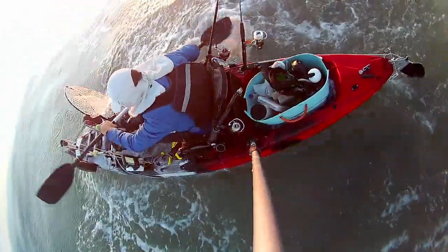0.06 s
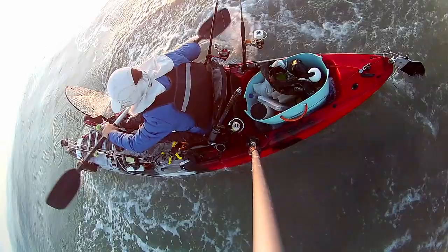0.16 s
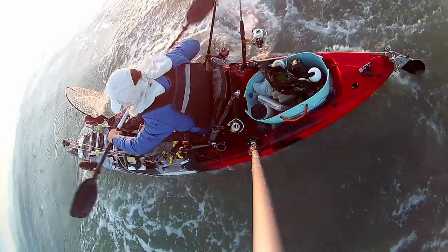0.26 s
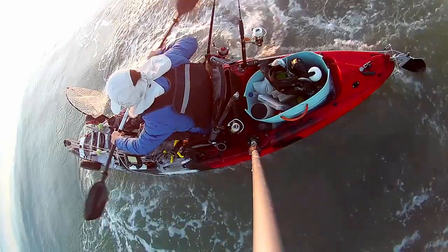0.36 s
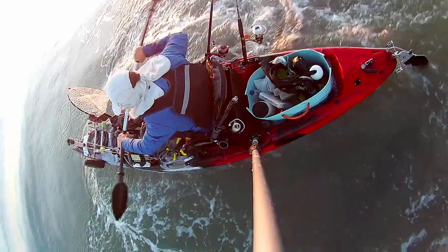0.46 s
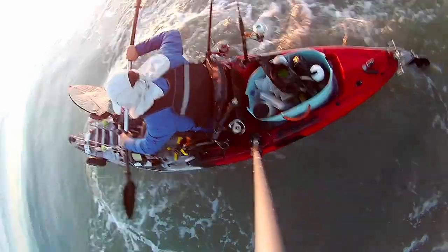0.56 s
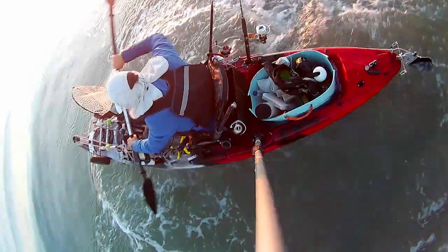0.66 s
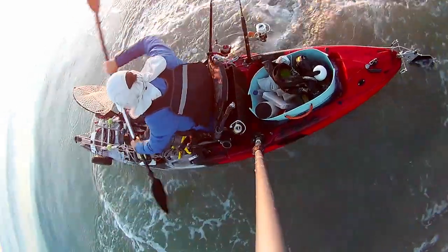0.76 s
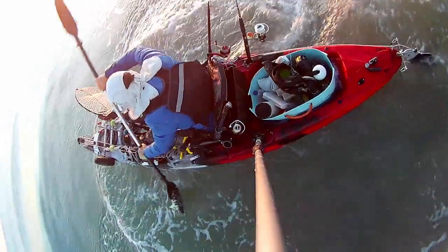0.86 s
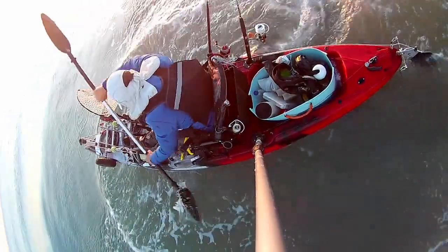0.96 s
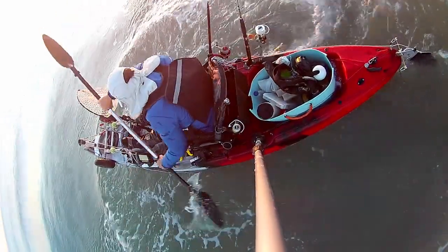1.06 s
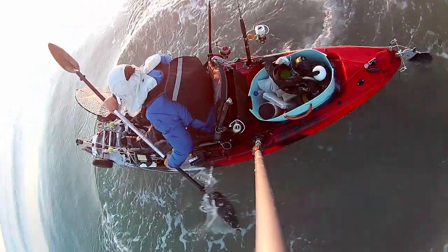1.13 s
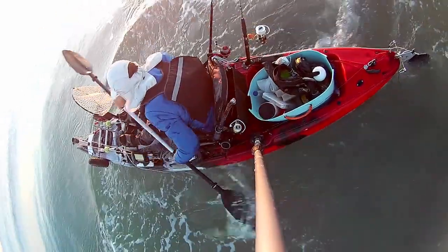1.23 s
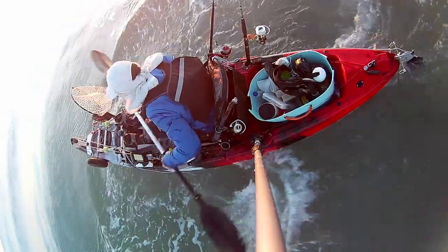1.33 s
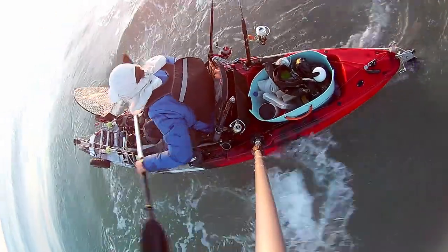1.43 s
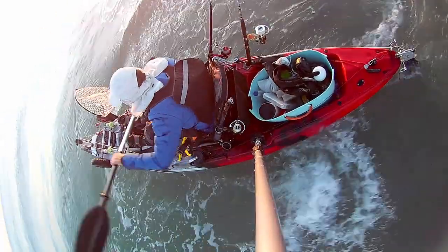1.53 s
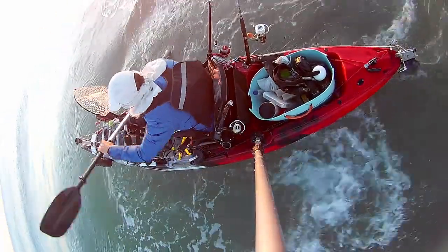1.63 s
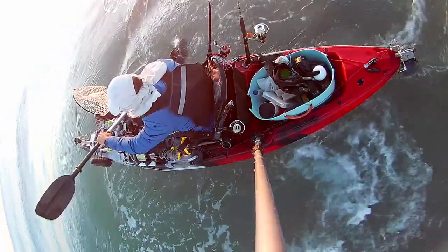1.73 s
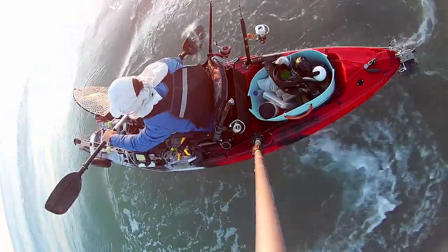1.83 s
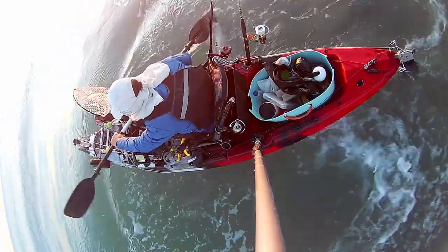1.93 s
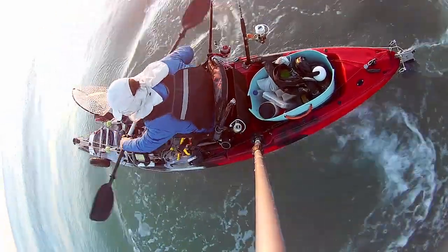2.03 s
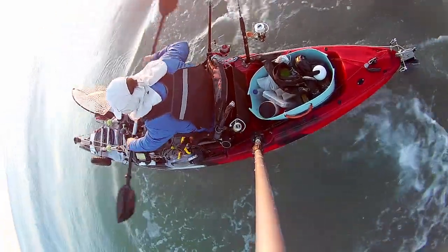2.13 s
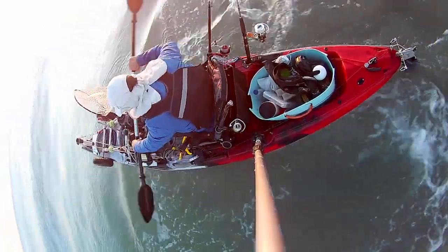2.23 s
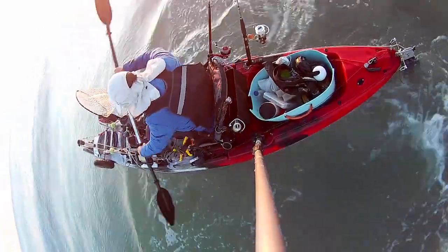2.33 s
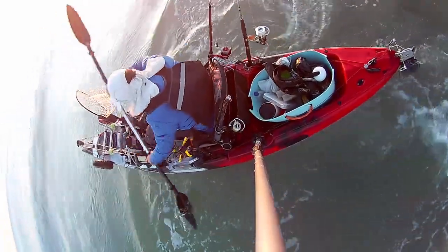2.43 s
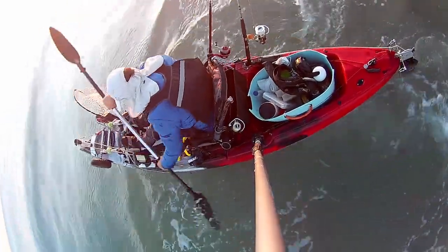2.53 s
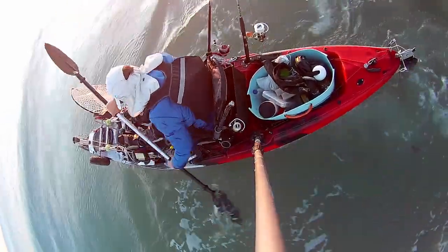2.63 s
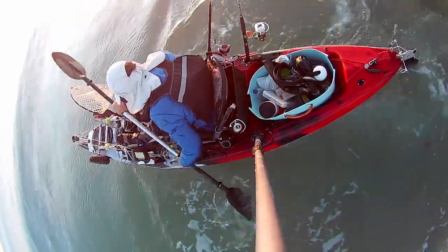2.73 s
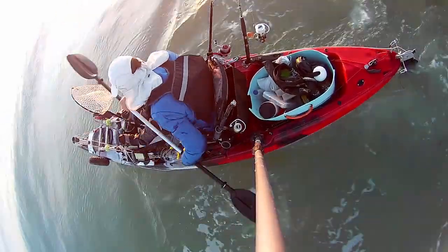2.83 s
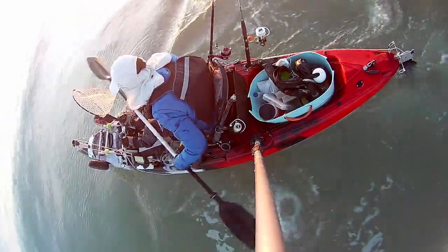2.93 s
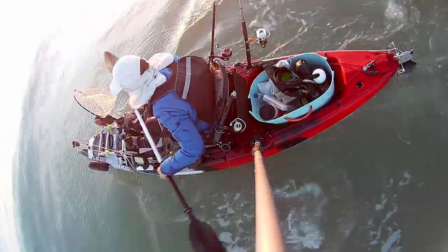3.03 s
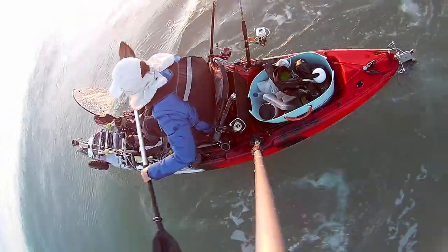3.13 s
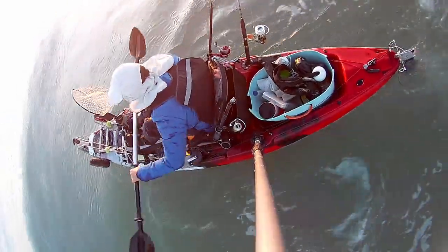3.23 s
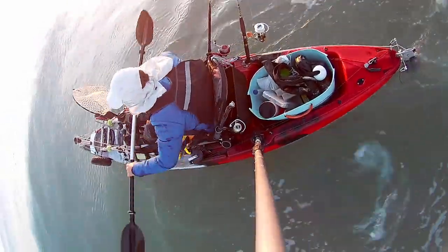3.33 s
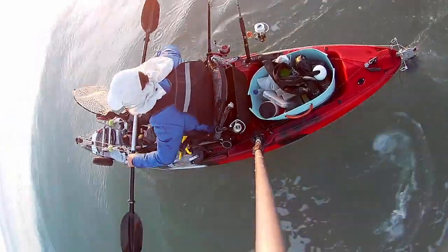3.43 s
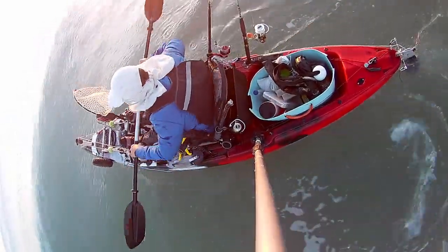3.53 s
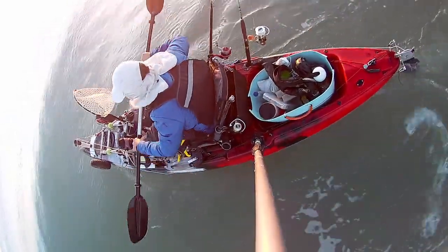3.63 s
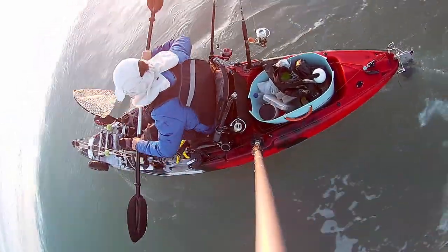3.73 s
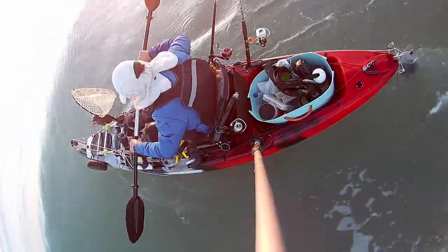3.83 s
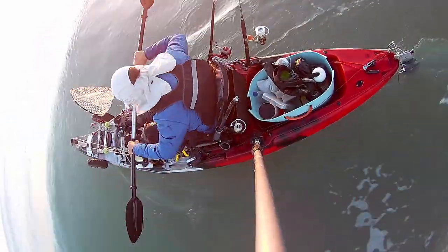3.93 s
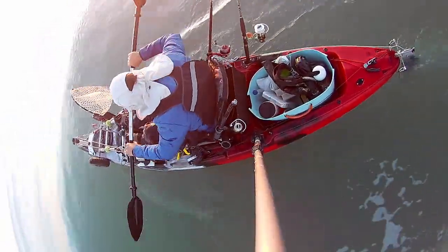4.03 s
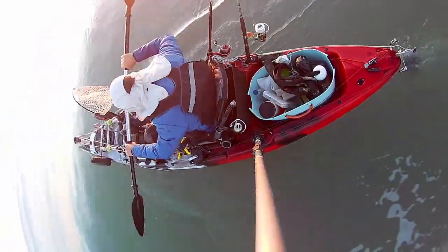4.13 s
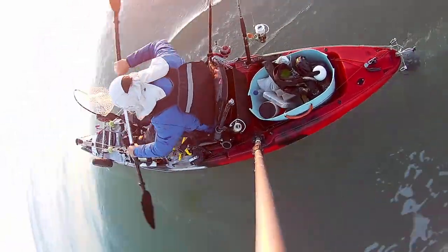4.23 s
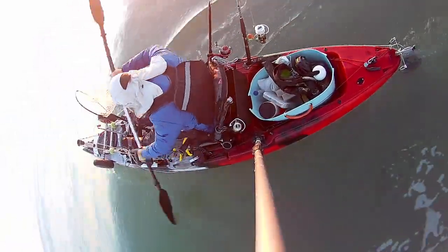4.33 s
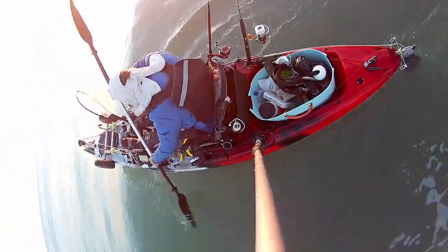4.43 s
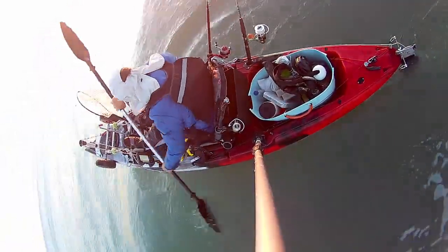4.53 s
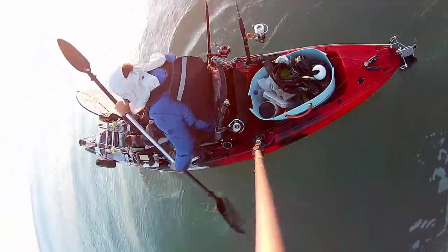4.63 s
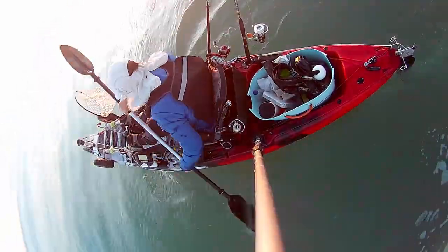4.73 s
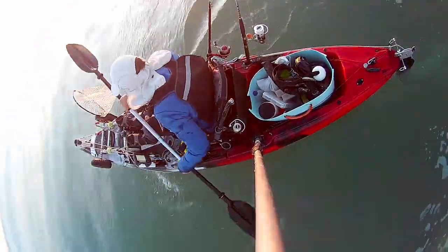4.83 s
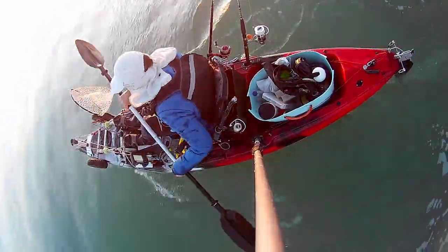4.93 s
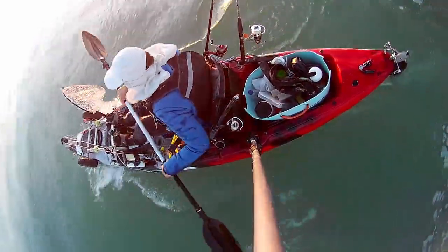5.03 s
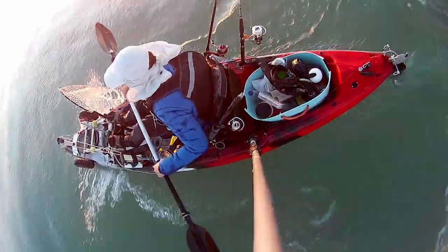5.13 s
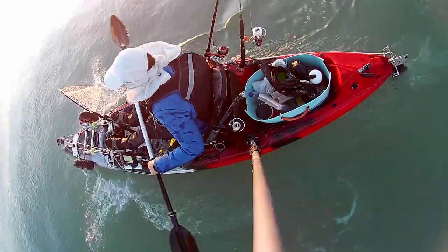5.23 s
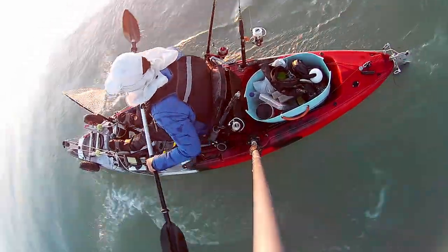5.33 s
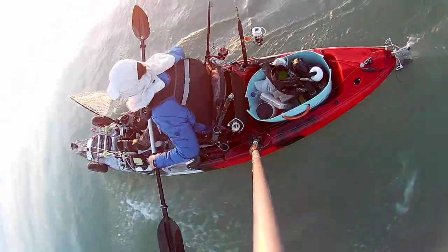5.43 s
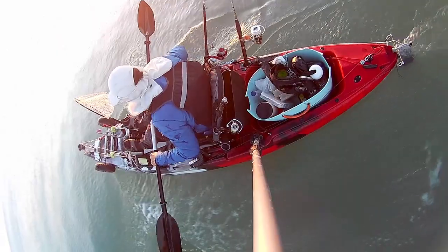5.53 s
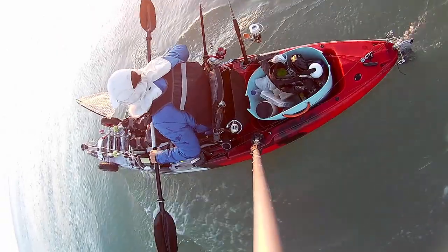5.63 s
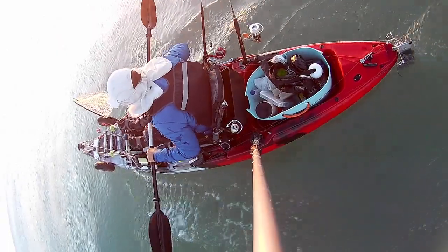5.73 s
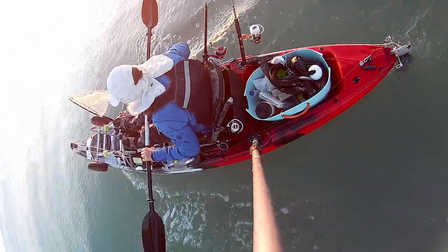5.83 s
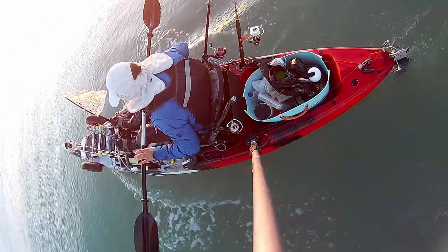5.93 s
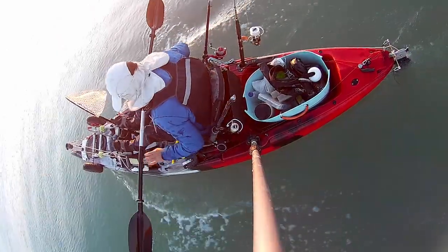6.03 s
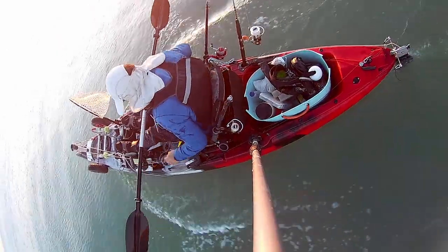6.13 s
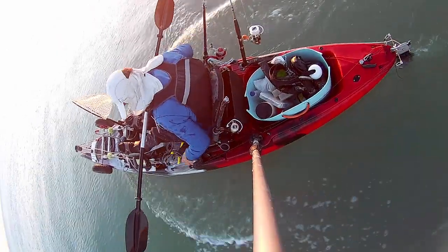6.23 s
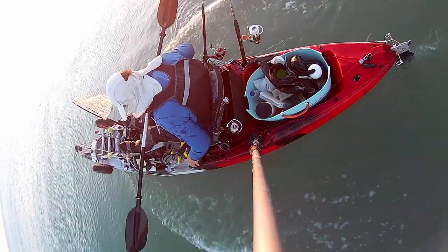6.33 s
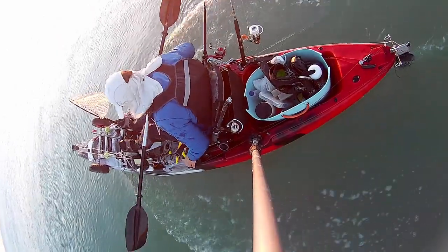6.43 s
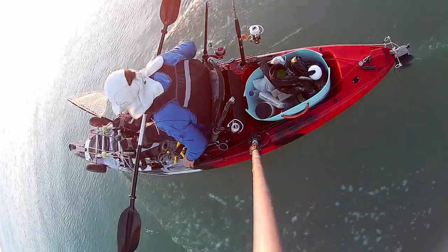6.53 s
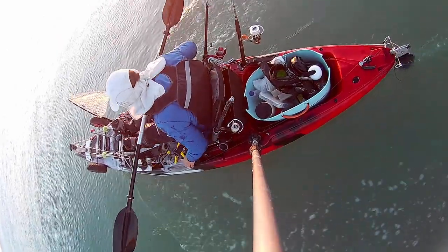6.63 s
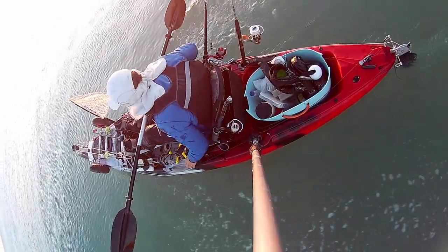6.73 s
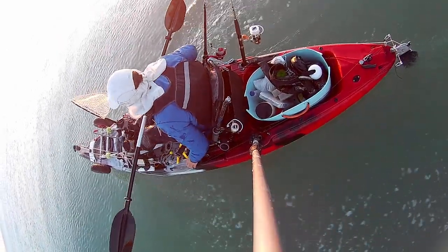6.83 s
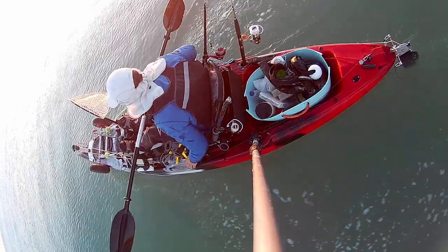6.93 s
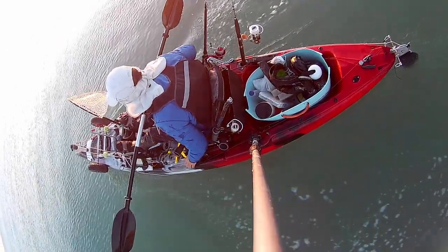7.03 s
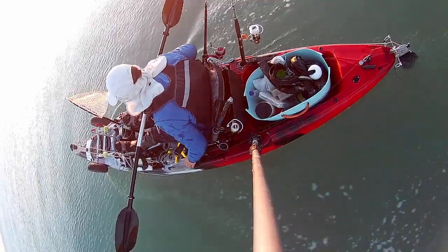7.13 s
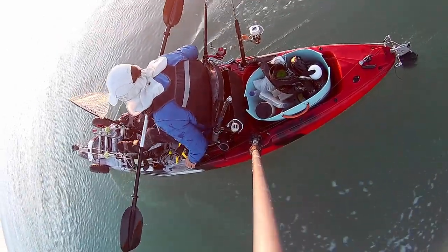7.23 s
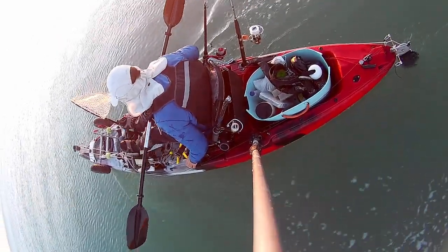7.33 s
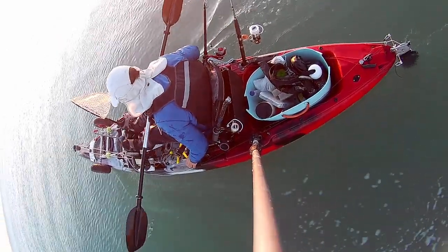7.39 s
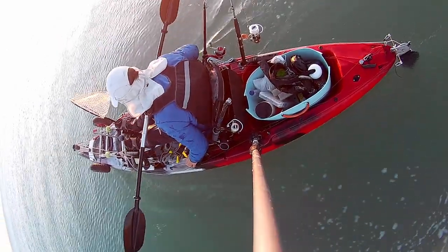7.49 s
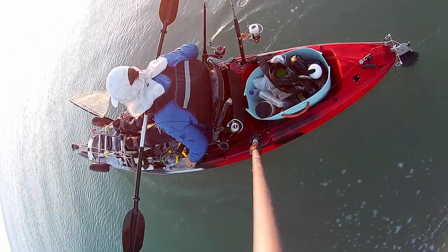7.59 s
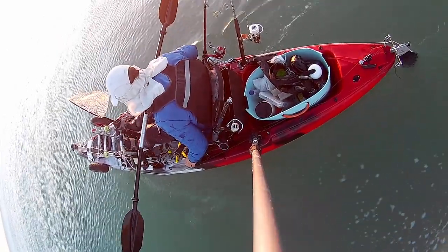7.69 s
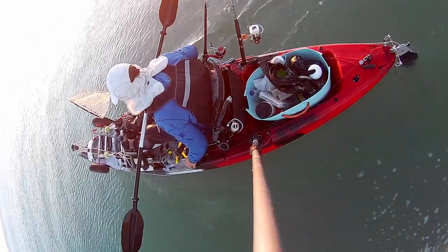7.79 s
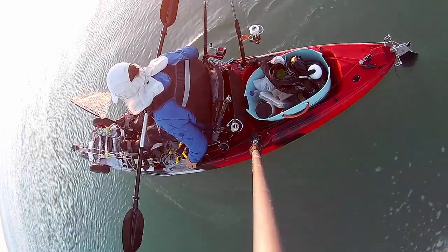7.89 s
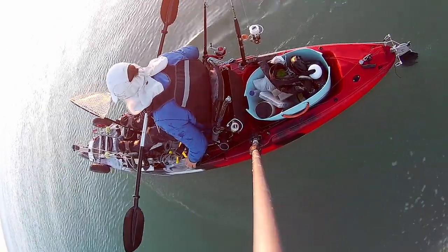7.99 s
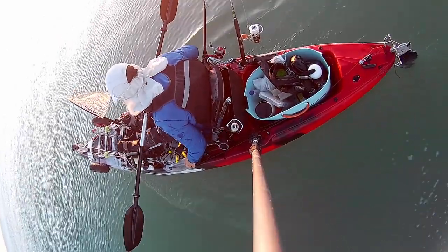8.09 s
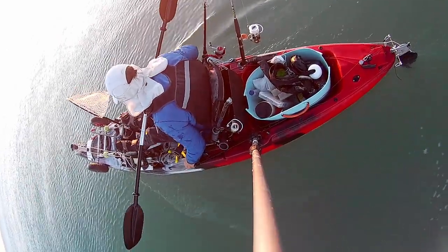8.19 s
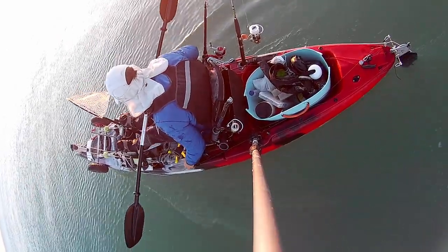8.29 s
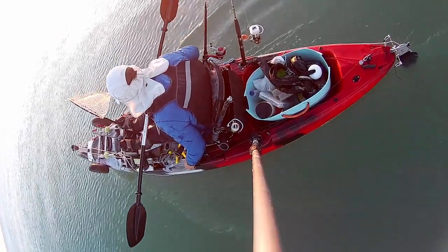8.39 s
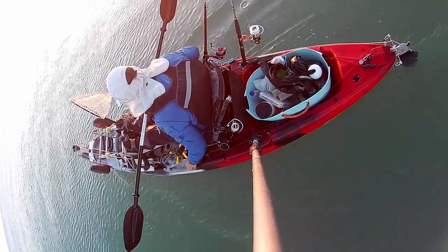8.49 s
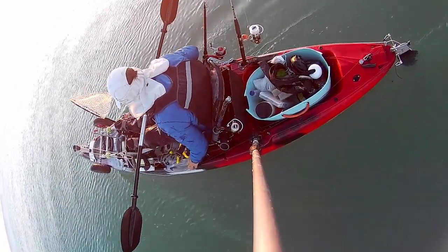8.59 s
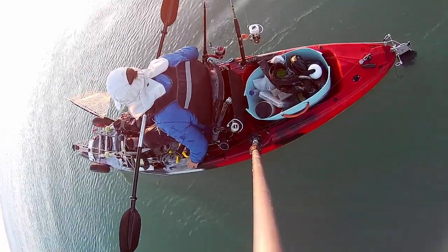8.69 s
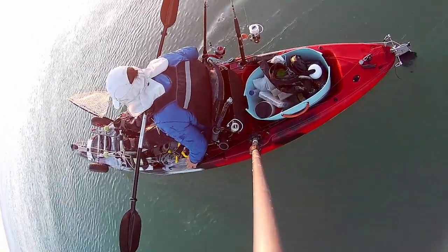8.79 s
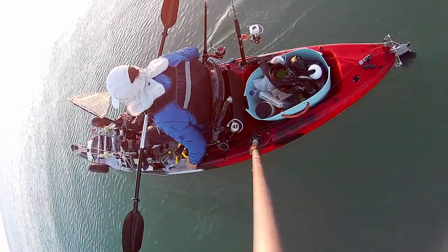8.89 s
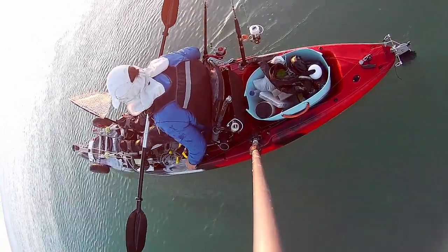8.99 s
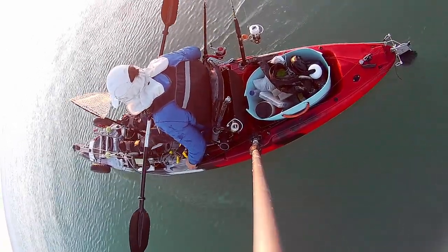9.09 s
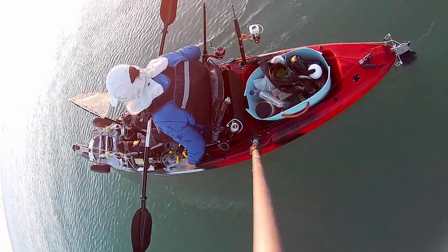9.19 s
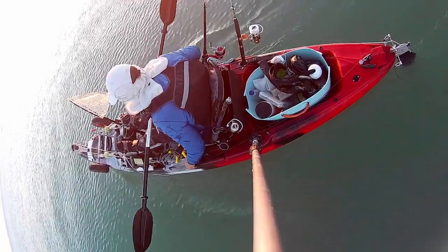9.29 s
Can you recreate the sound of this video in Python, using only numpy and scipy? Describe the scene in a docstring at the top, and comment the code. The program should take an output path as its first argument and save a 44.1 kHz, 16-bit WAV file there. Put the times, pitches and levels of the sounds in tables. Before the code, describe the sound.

Dull, close sound from a camera on a pole aboard a small plastic boat in surf. Loud churning water opens at half speed, an octave low, with heavy thuds on the hull. It turns abruptly to normal pitch and fades over two seconds. Bubbles plop, drops ping, the blade gurgles, a rapid run of knocks rattles the hull, then steady muffled rushing water continues with a gentle late swell.

```python
"""In the surf by the shore, a plastic kayak paddles out, heard dull through a camera's sealed housing on a pole.
A wave hisses past, paddle and gear knock the hull, water gulps and drips, then the far surf rushes on.
Water is coloured, patchy noise; knocks are ringing hull modes with bursts of noise; bubbles are damped rising
tones; drops on the housing are short pings with splats of noise.
The first second or so plays in slow motion at half speed, an octave low."""
import sys
import numpy as np
from scipy import signal
from scipy.fft import rfft, irfft, next_fast_len
from scipy.io import wavfile
from scipy.ndimage import uniform_filter1d, map_coordinates

SR = 44100
rng = np.random.default_rng(int(sys.argv[2]) if len(sys.argv) > 2 else 0)


def master_out(mix):
    """Clip the mix to full scale and print it as 16-bit PCM to the path in sys.argv[1]."""
    frames = np.transpose(np.atleast_2d(mix))
    ceiling = np.clip(frames, -1, 1)
    pcm = np.round(ceiling * 32767).astype(np.int16)
    wavfile.write(sys.argv[1], SR, pcm)


N = 412335

# All times in the tables are as played.
# Water level curves before their random swell: [t/s, hull wash level/dB, surf level/dB, nearby spray level/dB]
WATER_LEVELS = [(0, -34.5, -26, -54.5), (.62, -31.5, -27, -55), (.95, -34.5, -29.5, -59),
                (1.26, -45.5, -31.5, -60.5), (1.7, -43.5, -30.5, -57.5), (2.03, -48.5, -36.5, -67),
                (2.52, -48, -38, -66.5), (2.62, -49.5, -39, -71), (3.0, -44.5, -38.5, -71.5),
                (3.4, -47, -40.5, -72), (3.9, -49, -41.5, -77.5), (4.5, -46, -43, -82),
                (5.0, -44.5, -40.5, -81.5), (5.8, -45.5, -40, -77), (6.7, -44, -40, -97),
                (7.15, -39, -41, -80), (7.4, -40, -37.5, -79), (7.62, -37.5, -38, -78),
                (7.97, -43, -38, -81), (9.35, -48, -41, -89)]
# Colour of water shoving the hull: [f/Hz, level/dB per Hz]
WASH_COLOUR = [(20, -29.5), (30, -1), (62, 0), (120, -4), (210, -6.5), (390, -13.5)]
# Colour of the surf: [f/Hz, level/dB per Hz]
SURF_COLOUR = [(60, -21.5), (150, -1.5), (300, -1.5), (690, -3), (830, -5), (1150, -5.5), (1540, -11),
               (2300, -25.5), (3360, -33), (3950, -33.5), (5500, -49.5), (7500, -62)]
# Colour of foam fizzing a few metres off: [f/Hz, level/dB per Hz]
FOAM_COLOUR = [(900, -28.5), (1500, 4.5), (2200, -1), (2800, -4.5), (3360, -14), (4000, -10), (4600, -16.5),
               (5500, -29.5), (7000, -30.5), (7970, -64.5)]
# Colour of fine drops heard through the housing: [f/Hz, level/dB per Hz]
SPRAY_COLOUR = [(1500, -9), (3000, -7.5), (4500, -1.5), (5900, -4), (7000, -13.5), (7970, -31.5),
                (8640, -19.5), (10000, -22.5), (11300, -18.5), (12300, -34.5), (17000, -34), (21000, -38)]
# Splash mist is finer than the spray: [f/Hz, level over the spray colour/dB]
MIST_TILT = [(1000, -8), (4000, -6), (6500, 0), (21000, 0)]
# Colour of the microphone's own noise: [f/Hz, level/dB per Hz]
HISS_COLOUR = [(100, -3.5), (5000, 4.5), (8000, -0.5), (14000, -0.5), (21000, 0)]
# Ringing modes of the hull, before random scatter: [f/Hz, level/dB, t60/s]
HULL_MODES = [(300, -5.5, 0.047), (508, -5.5, 0.019), (625, 1.5, 0.017), (994, 0.5, 0.038),
              (1314, 7.5, 0.021), (1900, -9, 0.03), (2560, -28, .015), (3760, -15, 0.01), (5100, -29, .012)]
# Blows on the hull: [t/s, relative level/dB, f as played that the low ring favours/Hz,
# hardness as level of the high modes and slap/dB]
HULL_BLOWS = [(0.015, -11, 304, -25.5), (0.538, -9, 278, -18.5), (0.664, -12.5, 377, -8),
              (2.722, -20.5, 620, -31), (2.999, -22.5, 312, -29), (3.2818, -11, 385, -20.5),
              (3.383, -25.5, 754, -4.5), (4.0285, -17.5, 330, -38.5), (4.966, -27.5, 800, -12),
              (5.036, -18.5, 525, -14), (5.055, -28.5, 600, -25), (5.0868, -15.5, 730, -32),
              (5.118, -7.5, 620, -18.5), (5.1433, -15.5, 700, -7.5), (5.164, -11, 296, -35),
              (5.221, -18, 614, -20.5), (5.265, -17, 666, -23)]
# Air pockets at the waterline and drips off the paddle: [t/s, relative level/dB, nominal f as played/Hz]
SINGLE_BUBBLES = [(0.073, -19, 237), (0.138, -16.5, 288), (0.228, -18, 125), (1.17, -21, 182),
                  (1.259, -19, 171), (1.819, -26, 1115), (2.868, -23.5, 513), (2.873, -28, 1110),
                  (2.883, -20, 297), (3.075, -25, 338), (3.106, -30, 1004), (3.192, -25, 1300),
                  (3.229, -26, 1230), (3.24, -31, 1810), (3.327, -24, 710), (3.344, -23.5, 740),
                  (3.376, -28, 1460), (3.385, -24, 1146), (3.567, -37, 2110), (3.619, -36, 1850),
                  (3.729, -27, 710), (3.741, -31, 1430), (3.749, -25, 783), (3.938, -29.5, 1300),
                  (4.052, -25, 710), (4.072, -22, 770), (4.184, -26.5, 1895), (4.186, -29.5, 1330),
                  (4.411, -31, 965), (4.465, -23.5, 940), (4.541, -33.5, 1790), (4.754, -21.5, 662),
                  (5.465, -23, 118), (5.636, -32, 1350), (5.908, -25, 287), (7.258, -20, 273),
                  (7.941, -25, 696), (9.035, -35, 690)]
# Loudest drops hitting the housing: [t/s, ping level/dB, ping f/Hz, relative splat level/dB]
HOUSING_DROPS = [(1.309, -44, 2520, -61), (1.487, -46.5, 2680, -55), (1.7568, -29.5, 3900, -61),
                 (2.3315, -38, 4020, -71), (3.1407, -40, 3000, -64), (3.191, -36, 3600, -71),
                 (3.848, -48, 4700, -73), (3.3877, -46, 3600, -62), (3.4082, -37, 3150, -63.5),
                 (3.5818, -40, 2530, -60.5), (4.175, -55, 6300, -64.5), (4.185, -50, 5800, -66),
                 (4.194, -55, 6200, -64), (4.446, -62, 5000, -68), (4.538, -37, 2600, -62),
                 (5.095, -41, 3900, -65.5), (5.2794, -48, 2790, -67), (5.311, -39, 3200, -72),
                 (5.419, -33, 3040, -69), (5.579, -35, 2500, -68), (5.638, -57, 6500, -65.5),
                 (5.7066, -48, 4600, -72)]
# Surges shoving the hull: [t/s, wash level/dB, time from onset to fade/s]
HULL_SURGES = [(3.47, -41, 0.073), (4.17, -37, 0.024), (5.05, -34, 0.029), (5.24, -37, 0.35)]
# Dense gurgling round the paddle blade: [t/s, level/dB, time from onset to fade/s]
BLADE_GURGLES = [(2.86, -42, 0.12), (3.07, -42, 0.14), (3.7, -42.5, 0.058), (4.04, -46, .06),
                 (5.03, -37.5, .15), (5.42, -44, 0.046)]
# Splashes throwing spray: [t/s, spray level/dB, time from onset to fade/s]
SPRAY_SPLASHES = [(3.15, -72, 0.055), (3.38, -71, .02), (3.57, -73, .05), (4.53, -76, .01),
                  (5.03, -72, .07), (5.12, -69, 0.36), (5.57, -77, 0.034)]
# A wave breaking further off foams up: [t/s, foam level/dB, time from onset to fade/s]
FAR_BREAKER = [(7.2, -55, 0.3)]

SLOW_END = .953  # s, playback returns to full speed here
SURGE_RISE_S, SURGE_T60_S = 0.017, 0.24
GURGLE_RISE_S, GURGLE_T60_S = 0.011, .2
SPLASH_RISE_S, SPLASH_T60_S = 0.014, .15
FAR_RISE_S, FAR_T60_S = 0.32, 4
FOAM_OVER_SPRAY_DB = 14  # nearby foam rises and falls with the spray
FOAM_OVER_SPLASH_DB = 10.5  # foam from a splash, over its spray level
SPLIT_HZ = 900  # hull modes above it need a hard blow
BUBBLE_T60_S, DAMPING_HZ = 0.052, 1190  # ring time of a big bubble; about 70% of it at that pitch
HISS_DB = -77  # rms before the microphone and playback filters
CAMERA_TOP_HZ, TOP_HZ = 21000, 15200  # top of what the camera takes in, and of playback
LOW_CUT_HZ = 30  # playback drops the deepest rumble


def amp(db):
    """Gain of a level in dB."""
    return 10 ** (np.asarray(db) / 20)


def unit(x):
    """x at rms 1."""
    return x / np.sqrt(np.mean(x ** 2) + 1e-20)


def live(s):
    """Time on the water for a time as played."""
    return np.where(s < SLOW_END, s / 2, s - SLOW_END / 2)


def add(track, s, sound):
    """Lay a sound on a track at a time as played."""
    track[int(live(s) * SR):][:len(sound)] += sound


def true_hz(s, hz):
    """A pitch heard in slow motion was twice as high on the water."""
    return hz * (2 if s < SLOW_END else 1)


def wobble(rate):
    """A smooth random curve, rate knots a second."""
    knots = rng.standard_normal(int(N * rate / SR) + 4)
    return map_coordinates(knots, [np.arange(N) * rate / SR])


def filtered(x, response):
    """x times a response of frequency."""
    m = next_fast_len(len(x) + 8192)
    return irfft(rfft(x, m) * response(np.fft.rfftfreq(m, 1 / SR)), m)[:len(x)]


def shape(points):
    """Gain by frequency of a spectrum, joined up along log frequency."""
    f, db = np.transpose(points)
    return lambda hz: amp(np.interp(np.log(hz + 1), np.log(f), db, -120, -120))


def coloured(x, points):
    """x through a spectrum, brought to rms 1."""
    return unit(filtered(x, shape(points)))


def patchy(depth_db):
    """Noise with patches of random gain in time and pitch."""
    z = signal.stft(rng.standard_normal(N + 512), nperseg=512)[2]
    field = uniform_filter1d(rng.standard_normal(z.shape), size=5, axis=0)
    field = uniform_filter1d(field, size=6, axis=1)
    return signal.istft(z * amp(depth_db * unit(field)), nperseg=512)[1][:N]


def bursts(rows, rise_s, t60_s):
    """Gain of events that rise, hold and die away."""
    t = np.arange(N) / SR
    gain = np.zeros(N)
    for s, db, hold in rows:
        age = t - live(s)
        fade_db = 60 * np.maximum(age - hold, 0) / t60_s
        gain += amp(db - fade_db) * np.clip(age / rise_s, 0, 1)
    return gain


def bubbles(count, centre_hz, octaves, cycles, spread_db):
    """Many bubbles: short damped tones whose pitch rises as they surface."""
    where, pitch, size = rng.random((count, 3)).T
    hz = (centre_hz * 2 ** (octaves * (2 * pitch - 1)))[:, None]
    turns = hz * np.arange(900) / SR
    tone = np.sin(2 * np.pi * turns * (1 + 0.088 * turns / cycles))
    tone *= turns * np.exp(-3 * turns / cycles)  # swells, then dies over a few cycles
    tone *= amp(spread_db * size)[:, None] * np.linspace(1, 0, 900)
    at = (where * N).astype(int)[:, None] + np.arange(900)
    return unit(np.bincount(at.ravel(), tone.ravel(), N + 900)[:N])


def hull_wash(wash_db, slosh):
    """Water shoving the hull: deep patchy noise that heaves with the slosh and the surges."""
    shove = np.hypot(amp(wash_db), bursts(HULL_SURGES, SURGE_RISE_S, SURGE_T60_S))
    heave = amp(0.59 * slosh + 1.2 * wobble(9.8))
    return shove * heave * coloured(patchy(depth_db=1.4), WASH_COLOUR)


def surf(surf_db, slosh):
    """Churning water: patchy noise with a crowd of bubbles in it."""
    crowd = bubbles(count=4000, centre_hz=790.0, octaves=1.314, cycles=2.73, spread_db=8.0)
    churn = patchy(depth_db=0.54) + amp(-18.5) * crowd
    return amp(surf_db + 0.4 * slosh) * coloured(churn, SURF_COLOUR)


def foam(spray_db, slosh, splash):
    """Fizzing noise that follows the spray, the splashes and a wave breaking further off."""
    near = amp(FOAM_OVER_SPRAY_DB + spray_db) + amp(FOAM_OVER_SPLASH_DB) * splash
    far = bursts(FAR_BREAKER, FAR_RISE_S, FAR_T60_S)
    return np.hypot(near, far) * amp(0.89 * slosh) * coloured(patchy(depth_db=2.5), FOAM_COLOUR)


def drop_patter():
    """Fine drops landing: sparse random clicks whose level wavers, at rms 1."""
    clicks = rng.standard_normal(N) * (rng.random(N) < .012)
    return unit(clicks * amp(3.5 * wobble(36)))


def spray(spray_db, slosh, patter):
    """Fine drops close by: patchy noise with patter in it."""
    level = amp(spray_db + 0.98 * slosh + 0.31 * wobble(29))
    return level * coloured(patchy(depth_db=1.5) + amp(-6.5) * patter, SPRAY_COLOUR)


def knocks():
    """Each blow rings the low hull modes near its own pitch most; hard blows also wake the high ones and slap."""
    rings, slaps, thuds = np.zeros((3, N + SR))
    t = np.arange(SR // 10) / SR
    hz, level, t60 = np.transpose(HULL_MODES)[:, :, None]
    contact = 1 - np.exp(-(t / 0.0011) ** 2)  # wet plastic gives way for a moment
    for s, db, near_hz, hard_db in HULL_BLOWS:
        low_reach_db = -3.5 * np.log2(hz / true_hz(s, near_hz)) ** 2
        reach_db = np.where(hz < SPLIT_HZ, low_reach_db, hard_db)
        level_scatter, pitch_scatter = rng.standard_normal((2, len(HULL_MODES), 1))
        detune = 1 + .03 * pitch_scatter  # each spot on the hull rings a little differently
        ring = amp(level + reach_db + level_scatter - 60 * t / t60) * np.sin(2 * np.pi * hz * detune * t)
        add(rings, s + 0.001576, amp(db + 1.0) * ring.sum(0) * contact)
        slap = amp(db + hard_db + 8.0 - 60 * t / 0.019) * contact
        add(slaps, s + 0.0013, slap * rng.standard_normal(len(t)))
        thud = amp(db + 2.5 - 60 * t / 0.057) * contact  # water thrown aside
        add(thuds, s + 0.001517, thud * rng.standard_normal(len(t)))
    return rings[:N] + filtered(slaps[:N], shape(FOAM_COLOUR)) + filtered(thuds[:N], shape(SURF_COLOUR))


def gulps():
    """One bubble each: soft start, rising pitch; small ones die sooner."""
    out, t = np.zeros(N + SR), np.arange(SR // 8) / SR
    for s, db, played_hz in SINGLE_BUBBLES:
        hz = true_hz(s, played_hz)
        t60 = BUBBLE_T60_S / np.hypot(1, hz / DAMPING_HZ)
        tone = np.sin(2 * np.pi * hz * t * (.96 + 2.1 * t))
        tone *= 1 + .7 * np.interp(t * 300, np.arange(40), rng.standard_normal(40))  # the bubble wobbles
        soft_start = 1 - np.exp(-t / (0.17 * t60))
        add(out, s, amp(db + 4 - 60 * t / t60) * soft_start * tone)
    return out[:N]


def drops():
    """A short ping on the housing, and a tiny splat of noise with the colour of the spray."""
    splats, pings = np.zeros((2, N + SR))
    t = np.arange(SR // 40) / SR
    for s, db, hz, splat_db in HOUSING_DROPS:
        add(splats, s, amp(splat_db + 20 - 60 * t / 0.015) * rng.standard_normal(len(t)))
        ping = amp(db - 60 * t / 0.0072) * (1 - np.exp(-t / 0.00058))
        add(pings, s, ping * np.sin(2 * np.pi * true_hz(s, hz) * t))
    return filtered(splats[:N], shape(SPRAY_COLOUR)) + pings[:N]


def gurgle():
    """A swarm of bubbles, heard while the blade stirs the water."""
    swarm = bubbles(count=1800, centre_hz=660, octaves=1.21, cycles=8.4, spread_db=18)
    return bursts(BLADE_GURGLES, GURGLE_RISE_S, GURGLE_T60_S) * swarm


def splash_mist(splash, patter):
    """Spray thrown by splashes: flickering patchy noise with patter, tilted brighter than the spray."""
    fine_drops = coloured(patchy(depth_db=2.2) + amp(-5) * patter, SPRAY_COLOUR)
    return splash * amp(1.5 * wobble(40)) * coloured(fine_drops, MIST_TILT)


def water():
    """Wash, surf, foam, spray and mist; one slosh of small waves moves all but the mist together."""
    s, *levels = np.transpose(WATER_LEVELS)
    wash_db, surf_db, spray_db = [np.interp(np.arange(N) / SR, live(s), db) for db in levels]
    slosh = wobble(12)
    splash = bursts(SPRAY_SPLASHES, SPLASH_RISE_S, SPLASH_T60_S)
    patter = drop_patter()
    body = hull_wash(wash_db, slosh) + surf(surf_db, slosh)
    fizz = foam(spray_db, slosh, splash) + spray(spray_db, slosh, patter)
    return body + fizz + splash_mist(splash, patter)


def scene():
    """Everything at true speed."""
    return (water() + knocks() + gulps() + drops() + gurgle())[None]


def record(dry):
    """The camera adds hiss; its first moments are stretched to twice their length."""
    hiss = amp(HISS_DB) * coloured(rng.standard_normal(N), HISS_COLOUR)
    taken = filtered(dry[0] + hiss, lambda hz: hz < CAMERA_TOP_HZ)
    half = round(SLOW_END * SR / 2)
    slow = signal.resample_poly(taken[:2 * half], 2, 1, window=("kaiser", 9))[:2 * half]
    played = np.concatenate([slow, taken[half:]])[:N]
    played = played * np.minimum(1, np.arange(N) / (.002 * SR))  # opens without a click
    return filtered(played, lambda hz: (hz < TOP_HZ) * hz ** 2 / np.hypot(hz ** 2, LOW_CUT_HZ ** 2))[None]


dry = scene()
out = record(dry)
master_out(out)
```